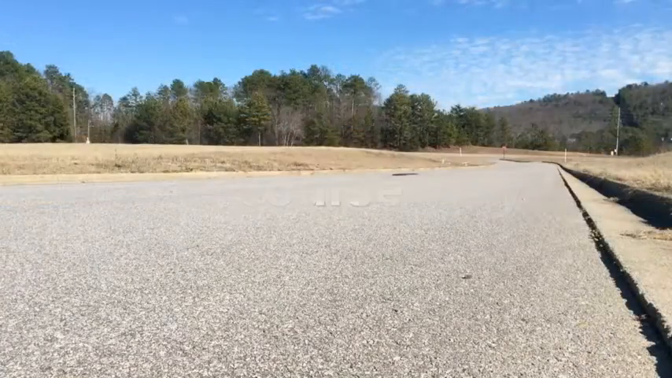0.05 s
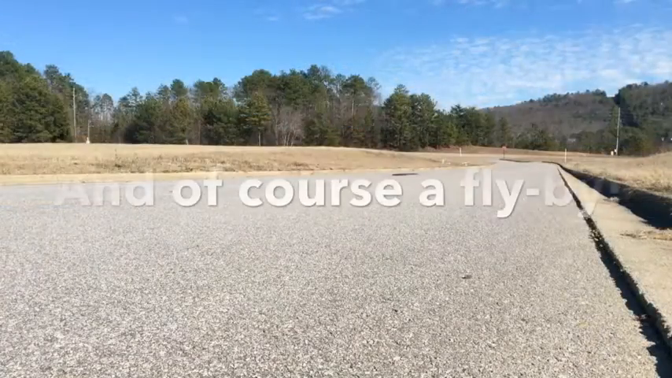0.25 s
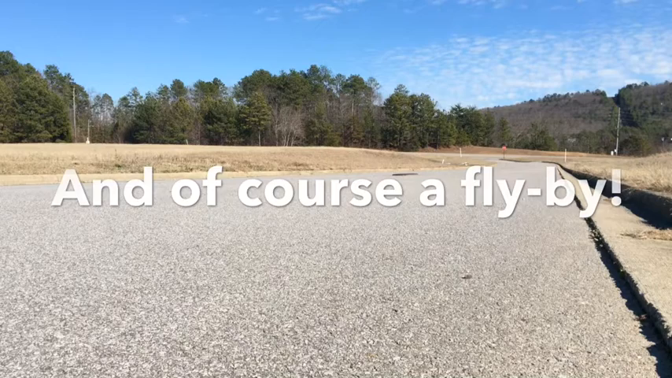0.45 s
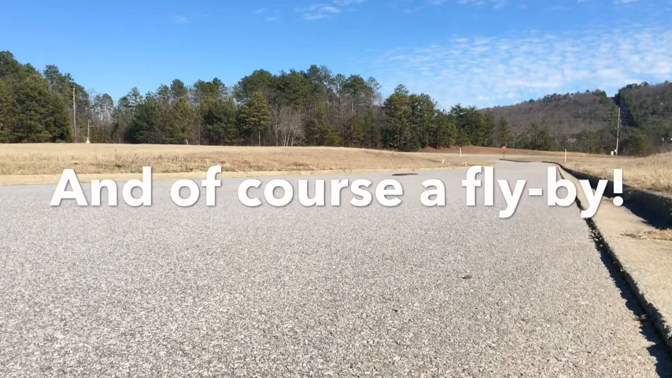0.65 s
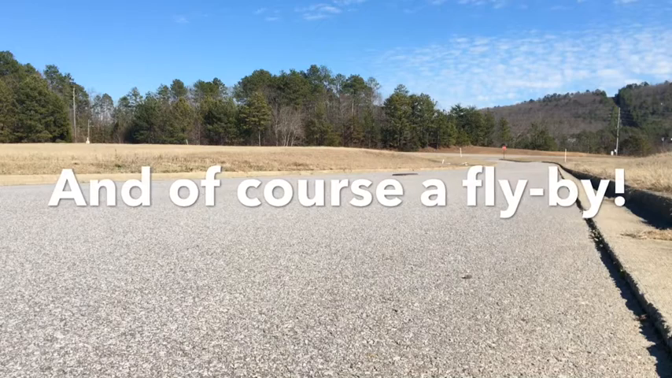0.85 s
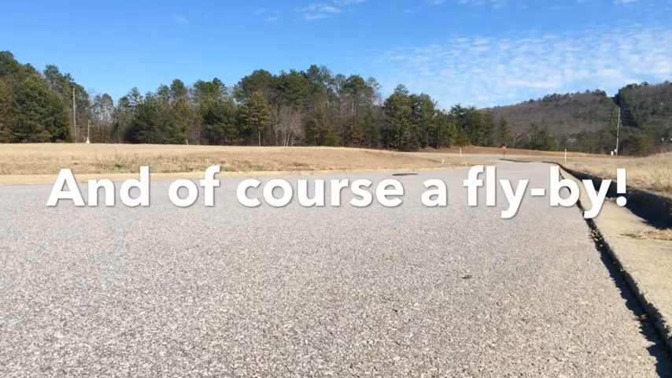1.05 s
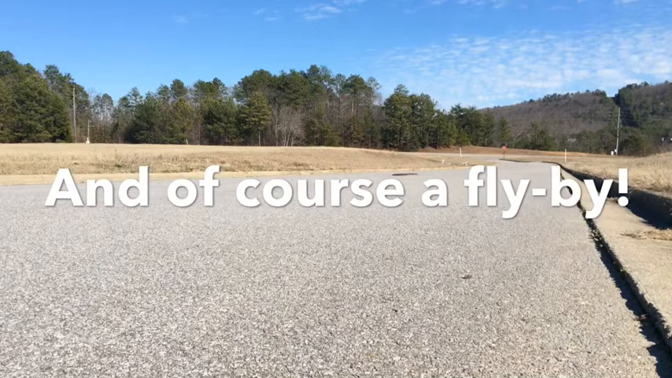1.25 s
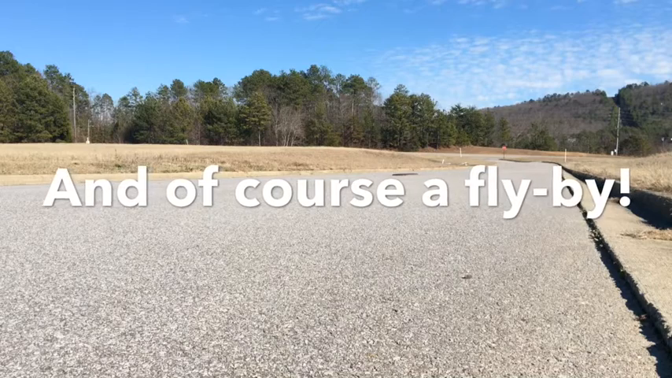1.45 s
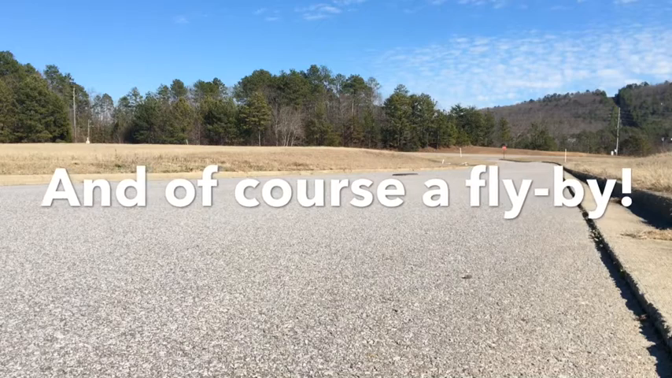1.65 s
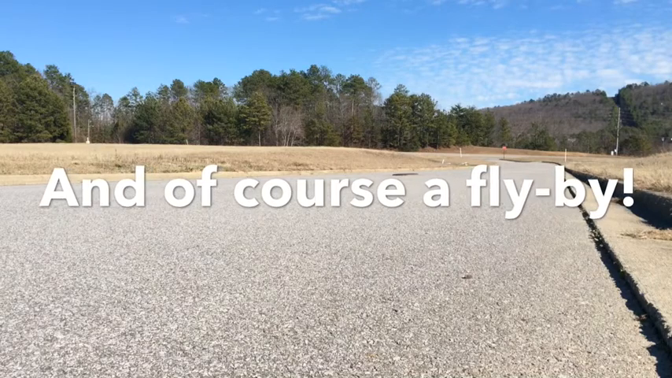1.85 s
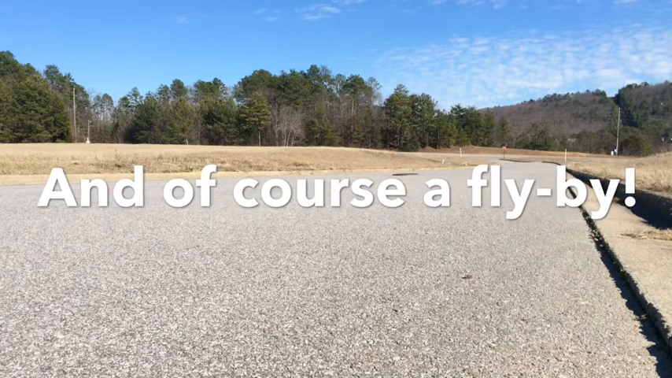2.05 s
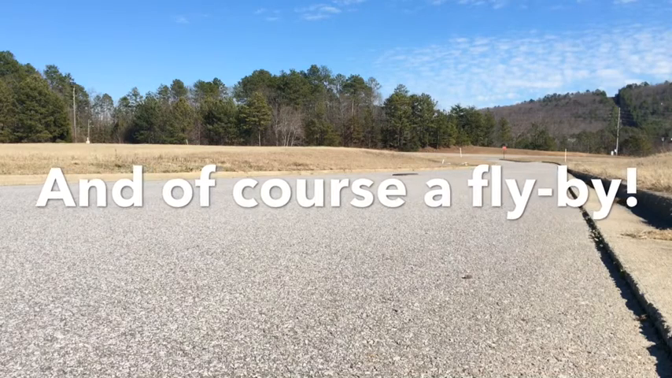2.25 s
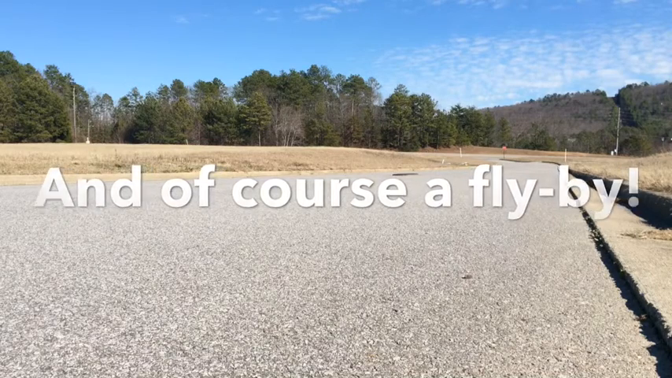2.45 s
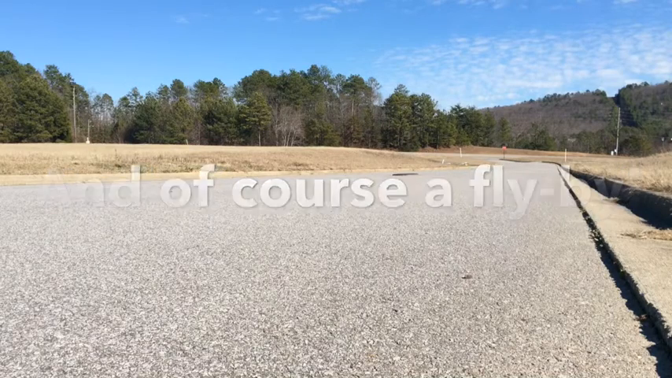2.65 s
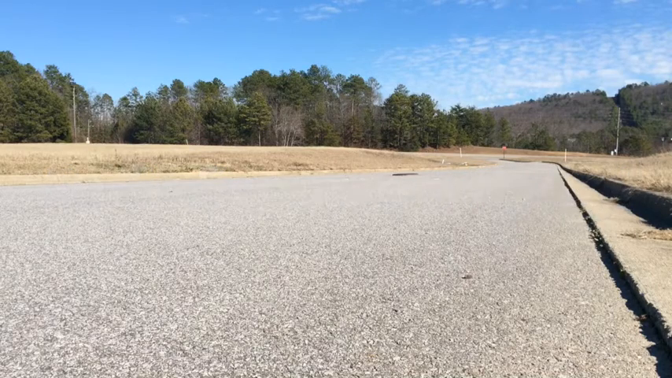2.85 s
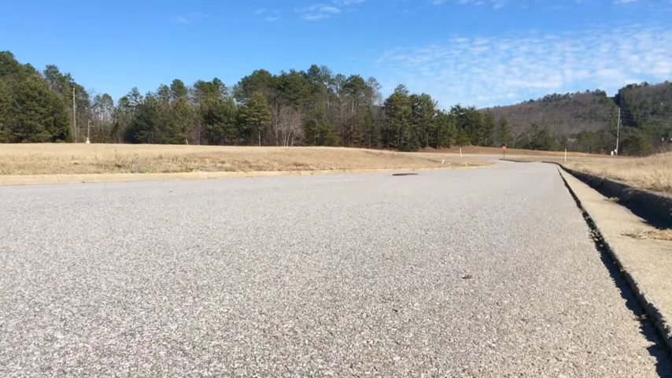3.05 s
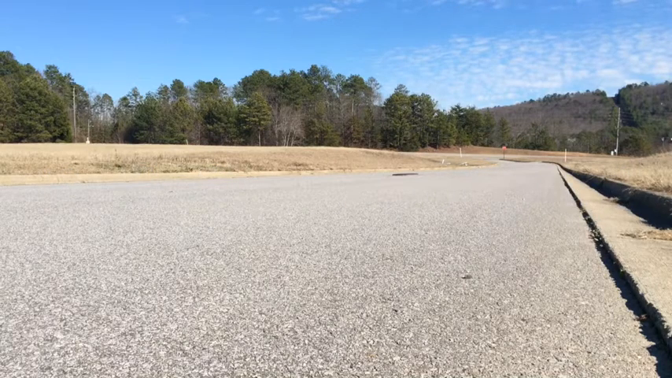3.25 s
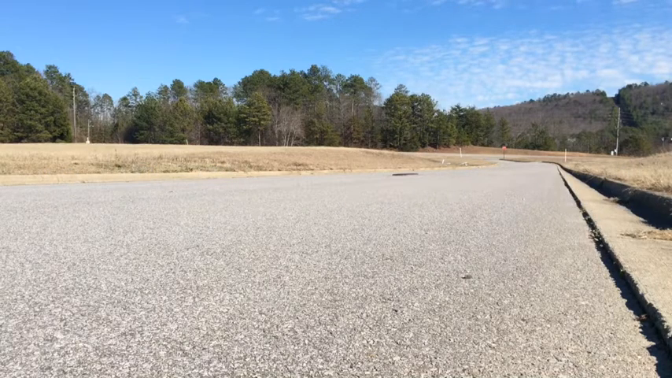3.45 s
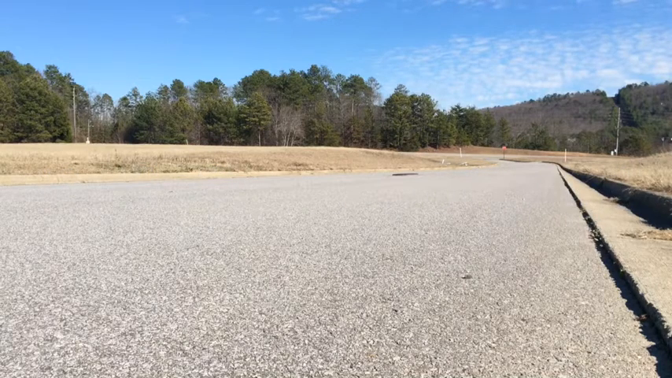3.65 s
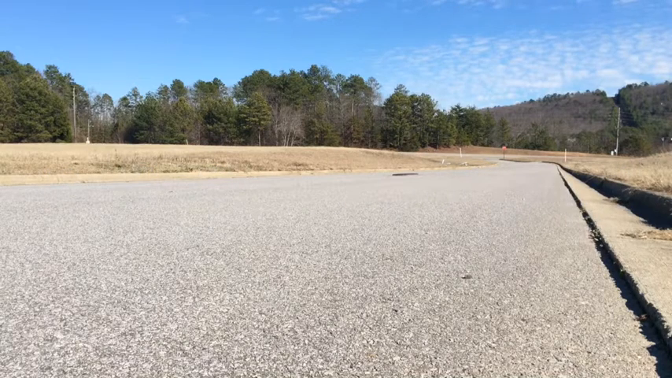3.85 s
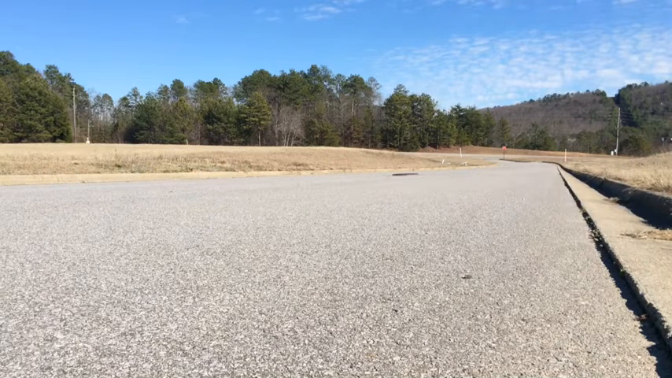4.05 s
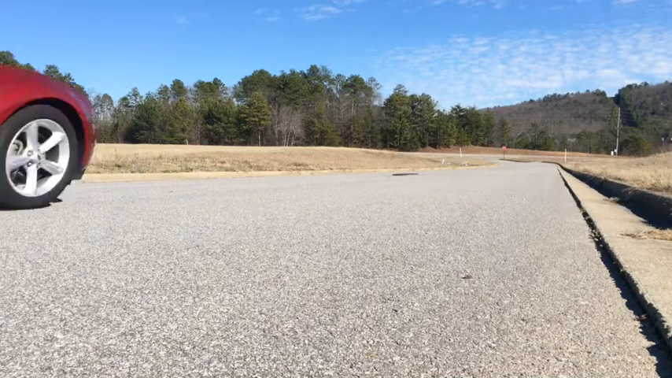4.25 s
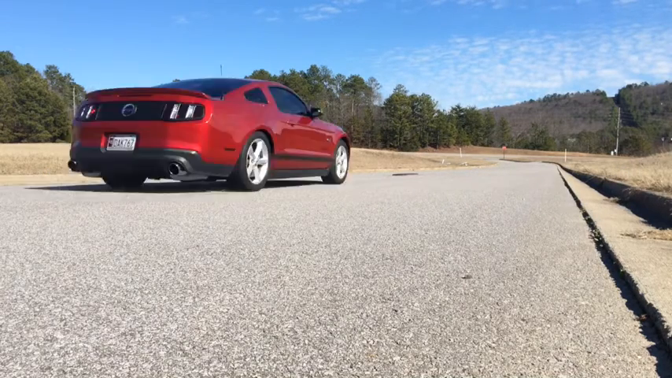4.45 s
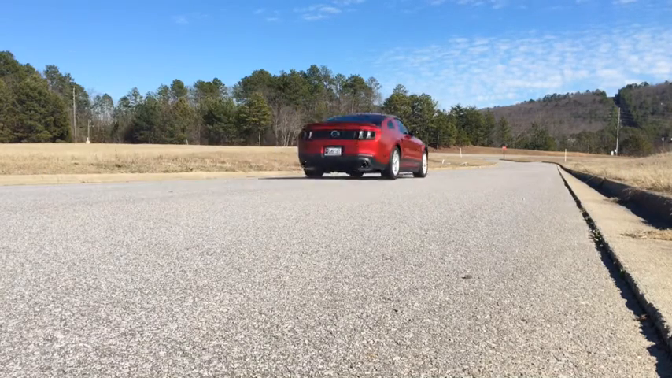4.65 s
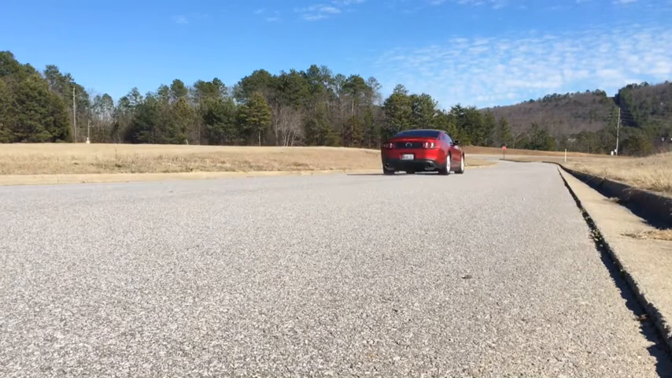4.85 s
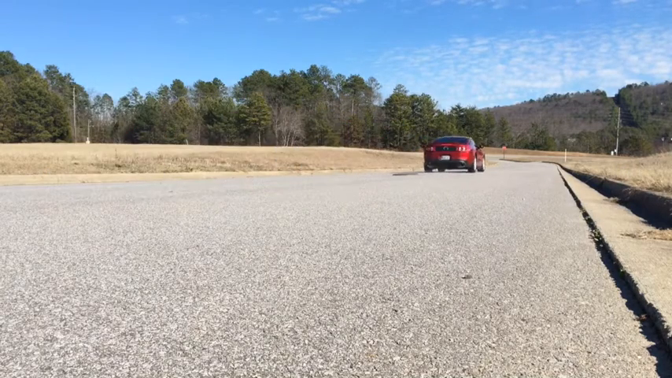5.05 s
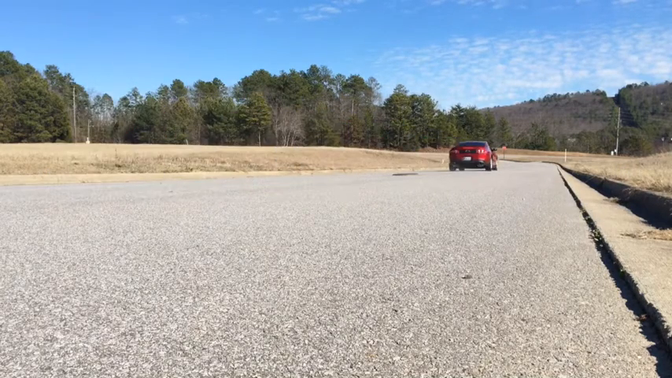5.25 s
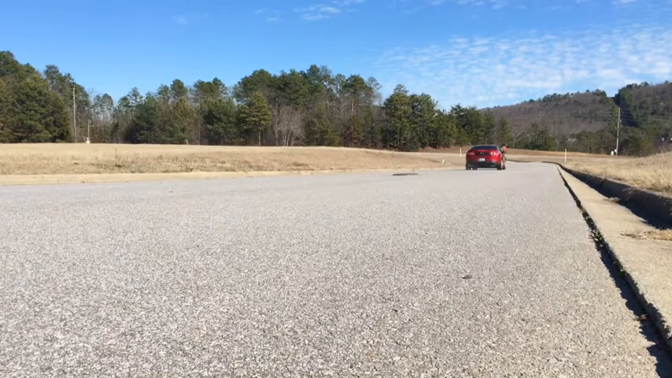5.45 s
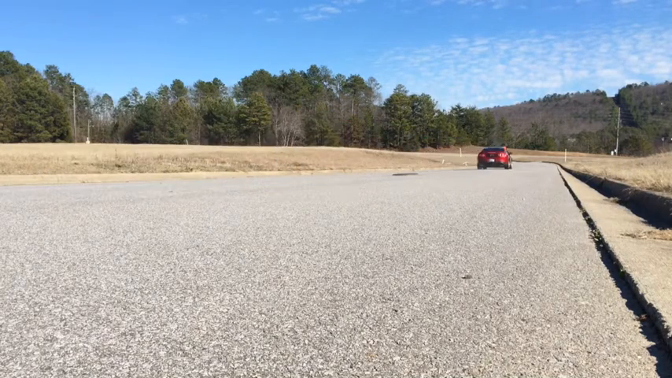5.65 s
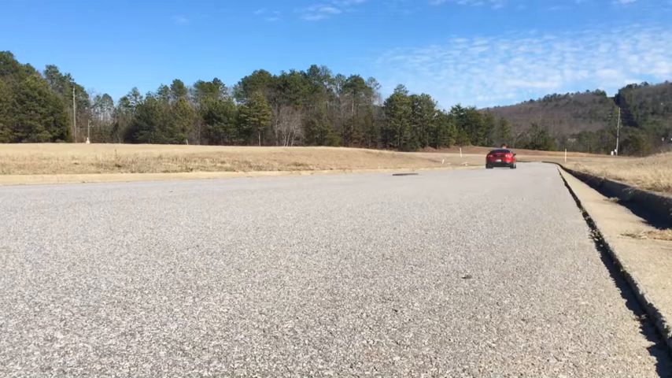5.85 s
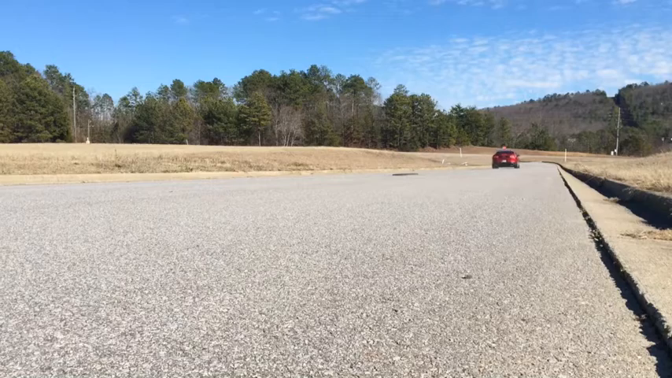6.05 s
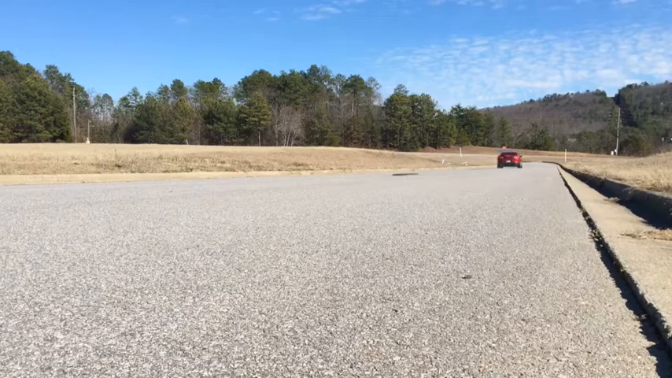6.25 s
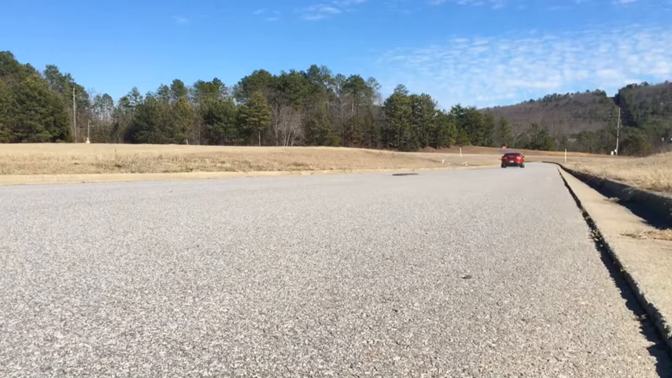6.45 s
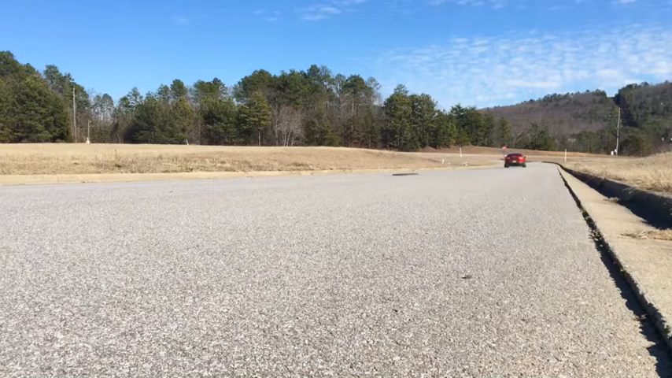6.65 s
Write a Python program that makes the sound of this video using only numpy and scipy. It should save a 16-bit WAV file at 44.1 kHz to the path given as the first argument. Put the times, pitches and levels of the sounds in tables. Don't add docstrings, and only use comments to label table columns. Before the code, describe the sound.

A powerful car with open exhausts approaches a stationary roadside microphone. Its dull, uneven throb climbs into a hard growl, broken by two brief throttle lifts, with slight belt whine and intake hiss. It rushes by with a full-bodied bark and bright exhaust fizz, pitch dipping. A rapid crackle follows as it lifts off, fading into burbling overrun, tyre noise and faint open-field hiss.

```python
import sys
import numpy as np
from scipy import signal
from scipy.fft import rfft, irfft, next_fast_len
from scipy.io import wavfile
from scipy.ndimage import uniform_filter1d, map_coordinates

SR = 44100
rng = np.random.default_rng(int(sys.argv[2]) if len(sys.argv) > 2 else 0)


def boost(x):
    u = np.asarray(x, float) / 20
    return 10 ** u


def digitize_waveform(pressure):
    field = np.atleast_2d(pressure).T
    bounded = np.clip(field, -1, 1)
    quanta = np.round(bounded * 32767).astype(np.int16)
    wavfile.write(sys.argv[1], SR, quanta)


N = 295911
TIME = np.arange(N) / SR
STRIDE = 64

PASS_S = 4.24, 4.613
SIDE_S, MISS_M = 4.46, 5.45
# (time [s], level [dB])
LEVEL = [(0.0, -39), (0.6, -50), (1.1, -42.5), (1.45, -42), (1.62, -32), (1.97, -34.5), (2.07, -38),
         (2.43, -41.5), (2.53, -31), (3.0, -31), (3.22, -37), (3.36, -29), (3.7, -27.5), (4.0, -19.0),
         (4.7, -28), (5.02, -39.5), (5.17, -33.5), (6.71, -42.5)]
# (frequency [Hz], width [Hz], level [dB])
PIPE_FRONT = [(302, 87, -2), (394, 71, -1.5), (550, 100, 2), (760, 680, -9), (1520, 140, -16)]
# (frequency [Hz], width [Hz], level [dB])
PIPE_REAR = [(246, 55, -10.5), (400, 112, -6), (556, 122, 3.5), (646, 92, -9.5), (1430, 140, -11)]
# (order of the cycle, coming [dB], added on the last stretch [dB], going [dB],
# added behind the rise [dB])
ORDERS = [(2, 1.84, -8, 0.1, -2.5), (3, 1.5, 4, 5, 0), (4, 3, 6, -3.5, -2), (5, -2, 5, 6, -0.5),
          (6, 8.5, 1.6, -0.5, 0), (7, 2.5, 10, -4.5, -4), (8, 9, 0.1, 3.5, 1), (9, 4, -6, -2, -1),
          (10, -5, 2, -3, 5), (11, -2, 8, 3.5, -5.5), (12, -7.5, 4.5, -4.5, -4.5),
          (16, -5.5, 0, -12.5, 0.5), (13, -7, 5.5, 2, -8), (14, -6, 5, 0.5, 2), (15, -12.5, 2.5, -5.5, -3)]
ORDER = [row[0] for row in ORDERS]


def unit(x):
    return x / np.sqrt(np.mean(x ** 2) + 1e-20)


def curves(rows):
    s, *cols = np.transpose(rows)
    return [np.interp(TIME, s, c) for c in cols]


def bell(centre_s, half_s):
    return np.exp(-.5 * ((TIME - centre_s) / half_s) ** 2)


def blend(a, b, share):
    share = np.clip(share, 0, 1)
    return np.sqrt(1 - share) * a + np.sqrt(share) * b


def wobble(rate):
    return map_coordinates(rng.standard_normal(int(N * rate / SR) + 4), [np.arange(N) * rate / SR], order=1)


def per_turn(turns, count):
    return map_coordinates(rng.standard_normal(int(turns[-1] * count) + 3), [turns * count], order=1)


def filtered(x, response):
    m = next_fast_len(N + SR // 2)
    return irfft(rfft(x, m) * response(np.fft.rfftfreq(m, 1 / SR)), m)[:N]


def colour(points):
    f, db = np.transpose(points)
    return lambda hz: boost(np.interp(np.log(hz + 1), np.log(f + 1), db))


def noise(gate, response, patchy_db=0):
    z = signal.stft(gate * rng.standard_normal(N), nperseg=1024)[2]
    field = uniform_filter1d(rng.standard_normal(z.shape), size=4, axis=0)
    field = uniform_filter1d(field, size=6, axis=1)
    patched = signal.istft(z * boost(patchy_db * unit(field)), nperseg=1024)[1][:N]
    return unit(filtered(patched, response))


def engine():
    hz, (tail, hidden), metres = revs(), view(), distance()
    turns = np.cumsum(hz) / SR
    order_db = order_levels(hz, tail, hidden)
    note_db, rasp_db, fizz_db, rumble_db = layer_levels(hz, metres, tail, hidden)
    share, scatter_db, spit_db = unevenness(hz, tail, hidden)
    tyre_share = np.clip((metres - 47.3) / 19, 0, 1) + tail * (0.29 + metres / 38)
    tyre_share = np.clip(tyre_share, 0, 1)
    size = boost(scatter_db * per_turn(turns, count=2))
    firing = lambda db: boost(db * per_turn(turns, count=8) - db ** 2 * np.log(10) / 30)
    gas = firing(spit_db) * (2.3 + .5 * np.cos(2 * np.pi * turns))
    low = size * drone(turns, order_db, scatter_db, tyre_share, tail, hidden)
    note = boost(note_db - 2.0) * np.sqrt(size) * pipe_note(turns, hz, firing(1.3 * spit_db), share, tail, hidden)
    return (low + note + boost(rasp_db + 2.0) * rasp(gas, tyre_share) + fizz(turns, gas, fizz_db, tail)
            + rumble(rumble_db) + belt_whine(turns))


def drone(turns, order_db, scatter_db, tyre_share, tail, hidden):
    hz = revs()
    angle = 2 * np.pi * turns
    slip = .02 + .012 * scatter_db
    chirp = .04 + .18 * np.clip((hz - 19) / 5, 0, 1)
    total = np.zeros(N)
    for k, db in zip(ORDER, order_db):
        above = max(k - 4, 0)
        trail = .5 * above ** 2
        lump = 2 * np.pi * k * .5 + np.pi + chirp * (k - 8) ** 2 - trail
        phase = trail + hidden * np.angle(np.exp(1j * lump))
        flutter_db = 0.11 + scatter_db * (0.83 * wobble(13) - .45) + 0.26 * above * wobble(6)
        total -= np.sqrt(2) * boost(db + flutter_db) * np.cos(k * angle - phase + k * slip * wobble(9))
    first_db = order_db[0] - 12.0 + 7.9 * tail * (-0.35 - tyre_share) + 19 * bell(SIDE_S, 0.12)
    return total + boost(first_db) * np.cos(angle)


def pipe_note(turns, hz, firing, share, tail, hidden):
    front, rear = (lambda f: pipe(f, PIPE_FRONT)), (lambda f: pipe(f, PIPE_REAR))
    barks, edges = bank_barks(turns, hz)
    awake = np.clip(TIME / .16, 0, 1) ** 2
    dulled = lambda f: front(f) / (1 + 1j * f / 650) ** 3
    knock = -hidden * awake * boost(-4) * unit(filtered(edges, dulled))
    beat = .5 + .5 * np.cos(2 * np.pi * turns)
    puff = (1 - hidden) * firing * (.7 + beat ** 2) + hidden * unit(.5 + barks)
    bark = blend(noise(puff, front, patchy_db=2.0), noise(puff, rear, patchy_db=1.5), tail)
    upper = upper_orders(turns, hz, tail, hidden)
    return blend(0.52 * upper, (0.35 + 0.75 * awake) * bark, share) + knock


def upper_orders(turns, hz, tail, hidden):
    place_db = [10, -4, -1.5, 0.5, -7.5, -1.5, -2, -10]
    step, knots = hz[::STRIDE], turns[::STRIDE]
    total = np.zeros(N)
    for k in np.setdiff1d(np.arange(17, 40), ORDER):
        front, rear = [np.abs(pipe(k * step, p)) for p in (PIPE_FRONT, PIPE_REAR)]
        swept_db = standing(k * step, hidden[::STRIDE], tail[::STRIDE])
        tone = np.interp(turns, knots, blend(front, rear, tail[::STRIDE]) * boost(swept_db))
        fading = boost(place_db[k % len(place_db)] * (1 - 0.64 * hidden) + 6 * wobble(5))
        phase = 2 * np.pi * (k * turns + rng.random()) + 0.048 * k * wobble(14)
        total += fading * tone / (1 + (k * hz / 950) ** 6) * np.cos(phase)
    return total / np.sqrt(uniform_filter1d(total ** 2, size=SR // 5))


def bank_barks(turns, hz):
    # (time [s], first over second [dB])
    lead = [(0, -7), (.3, -4.5), (.45, -2.5), (.65, 5), (.95, 6), (1.06, -4.5), (1.4, -4.5)]
    lead_db, = curves(lead)
    barks, edges = np.zeros(N), np.zeros(N)
    for sign, place in ((1, .19), (-1, .49)):
        gain = boost(2.5 * per_turn(turns, count=1) + sign * lead_db / 2)
        barks += gain * np.exp(-((turns - place) % 1) / .16)
        edges += gain * np.diff(np.floor(turns - place), prepend=-1)
    return barks, edges / np.sqrt(hz)


def rasp(gas, tyre_share):
    # (frequency [Hz], density [dB per Hz])
    gas_colour = [(470, -14.5), (800, -6.5), (1080, -12), (1500, -10), (1860, -12.5), (2010, -12.5),
                  (2800, -24), (3300, -20), (4380, -27.5), (5890, -31.5), (8000, -44.5), (11000, -53.5),
                  (14300, -82), (22000, -120)]
    # (frequency [Hz], density [dB per Hz])
    tyres = [(410, -31), (700, -1), (1230, -6), (1610, -8.5), (2290, -17), (2720, -21), (3480, -23.5),
             (4540, -34), (5930, -34.5), (7000, -45), (9000, -52), (11700, -81), (19800, -120)]
    roar = noise(gas ** 0.15, colour(tyres), patchy_db=1.5)
    return blend(noise(gas, colour(gas_colour), patchy_db=2.5), roar, tyre_share)


def fizz(turns, gas, fizz_db, tail):
    # (frequency [Hz], density [dB per Hz])
    spectrum = [(1290, -33.5), (2200, -9.5), (2450, -1), (2610, -4), (5110, -6.5), (7390, -5.5),
                (11800, -13.5), (15600, -21)]
    aim = np.clip(.15 + 1.6 * tail, 0, 1) * (.25 + .75 * pedal())
    since = turns - turns[round(4.5892 * SR)]
    spits = sum(boost(13 + db) * np.exp(-((since - lag) % 1) / .11)
                for lag, db in ((0, 0), (.68, -4)))
    jets = 1 + 1.2 * (1 - aim) + aim * spits
    close = np.clip((fizz_db + 90) / 9, 0, 1)
    return close * boost(fizz_db + 4.0) * noise(gas ** 0.21 * jets, colour(spectrum), patchy_db=2.0)


def rumble(rumble_db):
    # (frequency [Hz], density [dB per Hz])
    spectrum = [(21, -45.5), (36, -12), (125, -0.5), (167, -8.5), (226, -8), (300, -16), (390, -28),
                (660, -120)]
    return boost(rumble_db + 2.2 * wobble(14)) * noise(1, colour(spectrum))


def belt_whine(turns):
    # (order of the cycle, level [dB])
    whine_orders = [(37, -1), (49, 0)]
    # (time [s], level [dB])
    belt = [(1.7, -80), (2.05, -59), (2.45, -58), (2.6, -63), (3.05, -62), (3.3, -56), (3.5, -68), (4, -90)]
    belt_db, = curves(belt)
    return sum(boost(belt_db + db + 3.1 * wobble(19)) * np.sin(2 * np.pi * k * turns + .35 * wobble(40))
               for k, db in whine_orders)


def pipe(f, modes):
    ring = sum((-1) ** k * boost(db) * 1j * f * w / (c * c - f * f + 1j * f * w)
               for k, (c, w, db) in enumerate(modes))
    return ring / (1 + 1j * f / 1600) ** 3


def standing(f, hidden, tail):
    # (frequency [Hz], width [Hz], behind the rise [dB], coming [dB], going [dB])
    waves = [(188.7, 6.1, 3, 2, -0.3), (246.3, 12, -11.5, -8.5, 1.5), (285.6, 9.7, 5.5, 0.5, -0.4),
             (337.6, 6.3, -6, -3, -3), (373, 18, 6.5, 0.2, 1.6), (429, 8.2, 0, 2, 2.5),
             (517, 10, -5, -8.5, 0), (573, 16, 2, 5, 2), (621, 10, -1.5, -6, -1.2), (680, 23, 3.5, 5, 1.5),
             (784, 21, 1.5, -2, 1.5), (850, 16, 0, 2.5, 0.5)]
    return sum((hidden * far + (1 - hidden - tail) * coming + tail * going) * np.exp(-.5 * ((f - c) / w) ** 2)
               for c, w, far, coming, going in waves)


def swells(f):
    # (time [s], frequency [Hz], level [dB])
    moments = [(.05, 204, -10), (0.27, 276, 12), (0.46, 265, 7), (0.8, 220, 3.5), (.9, 250, -6),
               (1.32, 185, 2), (3.455, 140, 3), (4.6, 220, 2), (4.4, 760, 0), (4.68, 480, 3),
               (4.68, 100, -7), (4.9, 760, 4), (6.1, 450, 7), (5.95, 550, 10), (1.65, 426, 3.5),
               (1.95, 433, -13), (2.07, 306, 20), (3.4, 224, 1.5), (3.5, 433, 12), (3.75, 730, 6),
               (3.92, 390, -8), (4.15, 110, -9), (4.17, 380, 9.5), (4.35, 603, 2.5), (4.4, 350, 9),
               (4.5, 204, 9.5), (4.5, 476, 11), (4.55, 634, 11), (4.6, 415, 8), (4.82, 245, 7),
               (4.85, 380, -5), (4.87, 670, 17), (5.6, 125, 3.5), (5.95, 680, -6), (3.15, 210, -9),
               (3.15, 395, -9), (3.2, 250, 8.5), (3.8, 640, -8), (4.8, 300, -5), (4.5, 205, 7),
               (4.5, 105, 7), (4.5, 421, -6), (4.35, 990, 6), (5.1, 630, -8), (5.55, 170, 4),
               (6.15, 440, 3), (6.1, 505, 0), (3.7, 620, -7), (4.05, 383, -8.5), (4.2, 534, -5),
               (1.45, 250, 9.5), (.78, 185, 3), (4.2, 385, -6), (4.4, 430, -6.5), (4.9, 510, 5),
               (4.33, 610, 3.5), (5.85, 320, -8.5), (5.9, 640, -8), (2.3, 220, -6), (3.9, 612, 2),
               (1.3, 340, -9.5), (1.1, 460, -7), (3.22, 233, 6), (3.5, 420, -5), (.2, 60, -6),
               (6.6, 60, -6)]
    t = TIME[::STRIDE]
    return sum(db * np.exp(-.5 * ((t - s) / 0.067) ** 2 - .5 * ((f - c) / 28) ** 2) for s, c, db in moments)


def order_levels(hz, tail, hidden):
    # (frequency [Hz], level [dB])
    path_hidden = [(40, -10), (85, 0), (120, 5), (170, 12), (215, 7), (285, 0), (350, -2), (650, -5)]
    # (frequency [Hz], level [dB])
    path_front = [(85, 1.3), (110, 6.5), (150, 7), (185, 2.5), (230, -9), (330, -17), (500, -9.5),
                  (880, -3)]
    # (frequency [Hz], level [dB])
    path_rear = [(62, 6.5), (95, 1.5), (135, 5), (190, -5.5), (250, -2), (400, -4), (560, -2.5), (820, -8)]
    shape = lambda points, f: np.interp(np.log(f), np.log(np.transpose(points)[0]), np.transpose(points)[1])
    level_db, shut = curves(LEVEL)[0], 1 - pedal()
    side = bell(SIDE_S, .13)
    last = np.interp(TIME, (3.62, 4.18), [0, 1])
    idle = np.clip((17.4 - hz) / 4.4, 0, 1)
    lag, cancel = 1.18 * side ** 2 / 343, 0.62
    levels = []
    for k, coming, added, going, behind in ORDERS:
        f = k * hz
        slow_f = f[::STRIDE]
        swept = standing(slow_f, hidden[::STRIDE], tail[::STRIDE]) + swells(slow_f)
        pair_db = 20 * np.log10(np.abs(1 + cancel * np.exp(2j * np.pi * f * lag)) / (1 + cancel))
        db = level_db + np.interp(TIME, TIME[::STRIDE], swept) + pair_db
        db = db + hidden * (shape(path_hidden, f) + behind) + (1 - hidden - tail) * shape(path_front, f)
        db = db + tail * (shape(path_rear, f) + going)
        db = db + (1 - tail) * (coming + last * added - 8 * shut * (k > 3))
        db = db + side * (2 if k < 8 else 6.5)
        levels.append(db - 14.5 * (k % 2) * idle - 4.5 * afterglow())
    return levels


def layer_levels(hz, metres, tail, hidden):
    # (time [s], half length [s], level [dB])
    flares = [(0.357, 0.047, 2.5), (2.506, 0.034, 8.5), (3.383, 0.024, 0.5), (4.689, 0.031, -4),
              (4.76, 0.0091, 7.5), (4.821, 0.0076, -0.5), (4.904, 0.037, 8), (5.263, 0.037, 2.5),
              (5.657, 0.037, 6.5), (6.003, 0.058, 2.5), (6.576, 0.033, 8)]
    # (pipe note [dB], rasp [dB], fizz [dB], rumble [dB]); per dB of cause where that is in dB
    law = [(-11.5, -12, -31, -17.5), (0.1149, 0.37, 0.1, 0.4), (1.0543, 1.05, 2.5, 0.12), (-7.5, -3, -5, 0),
           (.5, 5.5, 13, 9.5), (2, -3.5, -17, -6), (8, 1, 2.5, 0), (-11.5, -14.5, 2.5, 1.5),
           (1.33, 0.12, -0.9, 1.22), (-0.77, 2, 3, -4.5), (-18.5, -4.5, -7, -22), (0.5, 5.5, 1, 7.5),
           (-0.5, 5.5, 4, -1)]
    shut = 1 - pedal()
    flare_db = sum(db * bell(s, half) for s, half, db in flares)
    nearness = MISS_M / metres
    lull = bell(4.99, 0.059)
    nose = bell(4.186, .12)
    causes = [np.ones(N), curves(LEVEL)[0], 20 * np.log10(nearness), shut * (1 - tail), tail, shut * tail,
              hidden, lumpiness(hz, hidden), flare_db, flare_db * nearness, lull, nose, afterglow()]
    return np.transpose(law) @ causes


def unevenness(hz, tail, hidden):
    share_law = (0.24, 0.7, 0.51, 0.16, 0.046)
    scatter_law = (0.69, 1.3, 2.43, 0.18, 0.77)
    spit_law = (-.3, 0.13, 1.6, 1.2, 1.2)
    shut = 1 - pedal()
    causes = [np.ones(N), shut * (1 - tail), shut * tail, hidden, lumpiness(hz, hidden)]
    return np.array([share_law, scatter_law, spit_law]) @ causes


def lumpiness(hz, hidden):
    return np.clip((40 - hz) / 26, 0, 1) * hidden


def afterglow():
    return bell(4.675, 0.029)


def revs():
    # (time [s], cycle rate [Hz])
    first_pull = [(0, 12.7), (.12, 14.3), (.27, 16.7), (.45, 20), (.66, 23.2), (.9, 27.25), (1.12, 31.5),
                  (1.36, 37.7),
                  (1.58, 46.2), (1.75, 51.05), (1.93, 55), (2.0, 55.2), (2.45, 49.4), (2.54, 45.8)]
    # (time [s], cycle rate [Hz])
    second = [(2.75, 49.55), (2.93, 51.9), (3.0, 51.7), (3.13, 49.6), (3.3, 45.3), (3.36, 44.7)]
    # (time [s], cycle rate [Hz])
    third = [(3.6, 48.9), (3.85, 51.7), (4.05, 53.7), (4.22, 55), (4.33, 55.1), (4.42, 53.2), (4.55, 51.8),
             (4.64, 51.3)]
    # (time [s], cycle rate [Hz])
    coast = [(4.7, 48.9), (4.9, 49.2), (5.02, 48.5), (5.12, 46.9), (5.3, 45.2), (5.55, 42.1), (6.71, 30.8)]
    return curves(first_pull + second + third + coast)[0]


def pedal():
    # (from [s], to [s], throttle left [0-1], slowness of the lift [ratio])
    pulls = [
        (-1, 2.0, 0, 1),
        (2.47, 3.04, .3, 4),
        (3.27, 4.63, 0, 1),
    ]
    open_s, shut_s = 0.029, 0.022
    rows, held = [], 0
    for start, end, left, slow in pulls:
        rows += [(start, held), (start + open_s, 1), (end, 1), (end + slow * shut_s, left)]
        held = left
    return np.clip(np.interp(TIME, *np.transpose(rows)), 0, 1)


def distance():
    t = TIME - 4.449
    coming_ms, going_ms, fade_in_m = 27.7, 21.54, 71.3
    along = np.where(t < 0, fade_in_m * np.tanh(coming_ms * t / fade_in_m), going_ms * t)
    return np.hypot(MISS_M, along)


def view():
    return np.interp(TIME, PASS_S, [0, 1]), np.interp(TIME, (1.344, 1.495), [1, 0])


def overrun():
    # (time [s], peak [dB], ring of the pipe [dB])
    cracks = [(2.066, -33, 13), (3.513, -32, 4.5), (4.726, -26, 3), (4.743, -7, 2), (4.749, -4.5, 6),
              (4.7625, -16.5, 5), (4.7712, -5, -9), (4.7927, -8.5, 6), (4.835, -7.5, -11), (4.8556, -8, -8),
              (4.8678, -6.5, 6), (4.8785, -6, -7), (4.8956, -17, 0), (4.9097, -16, 12), (4.93, -13.5, -11),
              (5.116, -23, -2.5), (5.124, -34, 22.5), (5.1602, -21, 20), (5.1963, -21.5, 19),
              (5.2674, -11, 12), (5.356, -29, 9.5), (5.52, -37.5, 20), (5.5405, -25, 20), (5.6427, -38, 11),
              (5.6845, -34, 25), (5.911, -27, -2), (5.927, -23.5, 22), (6.5945, -45.5, 19.5),
              (5.4791, -30.5, 8), (5.8737, -34.5, 8), (6.0924, -37.5, 8), (6.2965, -37, 9),
              (6.3841, -34, 7.5), (6.405, -41, 7)]
    # (time [s], peak [dB])
    snaps = [(2.066, -54), (3.512, -44), (4.8955, -36), (4.914, -36), (3.63, -46), (4.652, -20),
             (4.674, -34.5), (4.695, -30), (4.7426, -15.5), (4.751, -18), (4.7707, -18), (4.8692, -22),
             (4.8768, -20.5), (4.9296, -36), (5.197, -35.5), (5.33, -41)]
    # (time [s], peak [dB], frequency [Hz])
    thuds = [(2.055, -9, 164), (2.069, -19, 166), (2.113, -16.5, 165), (2.146, -9.5, 91), (2.29, -27, 97),
             (2.375, -32, 154), (4.389, -15, 60), (4.43, -15, 55), (4.48, -14, 75), (4.747, -27, 144),
             (5.156, -13, 1313), (5.195, -16, 1240), (5.202, -9, 127), (6.065, -19, 129), (6.084, -14, 102),
             (6.265, -11.5, 104), (6.29, -17.5, 123), (6.406, -14.5, 128), (6.461, -17, 129),
             (6.557, -24.5, 136), (6.642, -18, 89)]
    # (frequency [Hz], gain [dB])
    crack_colour = [(300, -39.5), (1200, 4), (4000, -2.5), (9000, -32), (15000, -36)]
    # (frequency [Hz], gain [dB])
    snap_colour = [(1500, -30.5), (4000, -2), (7000, 0.5), (11000, -12), (15500, -14.5)]
    t = np.arange(SR // 10) / SR
    crack, snap, thud = np.zeros((3, N + SR))
    kick = np.zeros(N)
    for s, db, ring_db in cracks:
        crack[round(s * SR):][:len(t)] += boost(db - 0.5 - 60 * t / 0.03) * rng.standard_normal(len(t))
        kick[round(s * SR)] = -boost(db + ring_db + 24)
    for s, db in snaps:
        snap[round(s * SR):][:len(t)] += boost(db - 60 * t / 0.031) * rng.standard_normal(len(t))
    for s, db, hz in thuds:
        swell = t / 0.01 * np.exp(1 - t / 0.0062)
        thud[round(s * SR):][:len(t)] += boost(db - 3.5) * swell * np.sin(2 * np.pi * hz * t)
    ring = filtered(kick, lambda f: pipe(f, PIPE_REAR))
    return filtered(crack[:N], colour(crack_colour)) + filtered(snap[:N], colour(snap_colour)) + ring + thud[:N]


def intake():
    # (frequency [Hz], density [dB per Hz])
    air = [(4000, -30), (6500, -3), (8500, 0), (11000, -8), (14000, -20), (16000, -60)]
    # (frequency [Hz], density [dB per Hz])
    howl = [(900, -40), (1060, -4), (1130, 1), (1230, -12), (1500, -4.5), (1800, -14), (2300, -50)]
    seen = np.interp(TIME, (2.0, 2.47), [0, 1]) * np.interp(TIME, PASS_S, [1, 0]) * pedal() ** 2
    hiss = seen * boost(curves(LEVEL)[0] - 42) * noise(1, colour(air), patchy_db=1.5)
    return hiss + boost(-52.5) * bell(1, 0.19) * noise(1, colour(howl), patchy_db=2.5)


def fields():
    # (frequency [Hz], density [dB per Hz])
    hiss = [(2940, -35), (5000, -5), (14100, 0), (15600, -6)]
    return boost(-81) * noise(1, colour(hiss))


def scene():
    return (engine() + overrun() + intake() + fields())[None]


def roll_off(x):
    return signal.sosfilt(signal.butter(12, 15710, fs=SR, output="sos"), x)


def record(dry):
    rounded = dry / (1 + np.abs(dry) ** 8) ** (1 / 8)
    return roll_off(rounded)


dry = scene()
out = record(dry)
digitize_waveform(out)
```